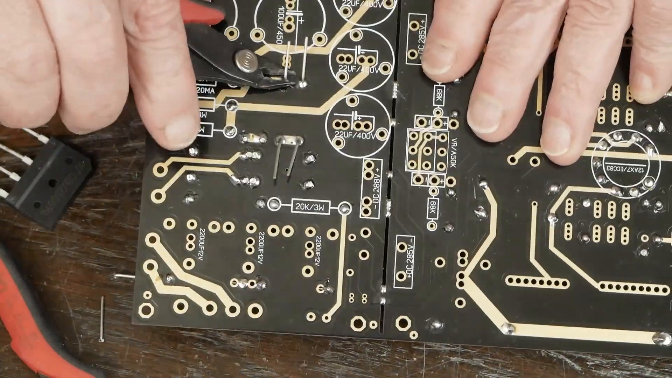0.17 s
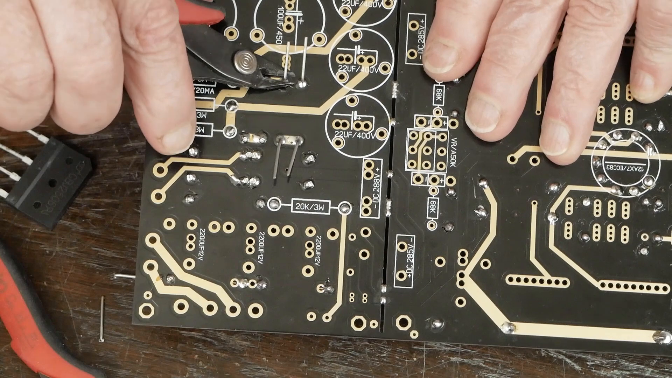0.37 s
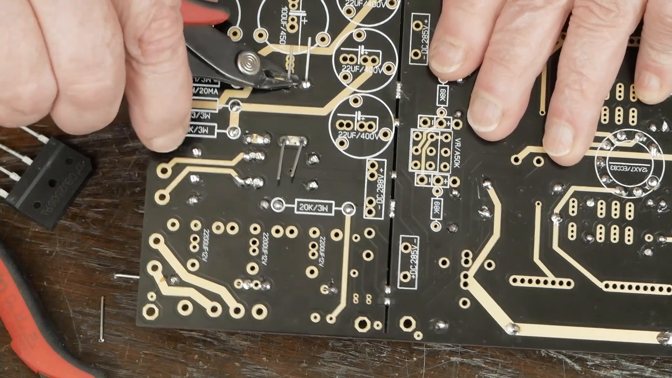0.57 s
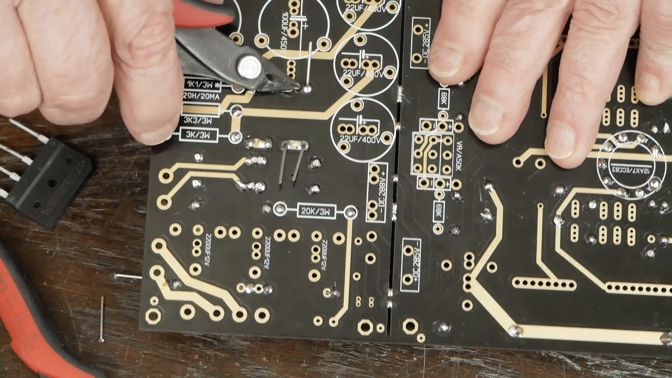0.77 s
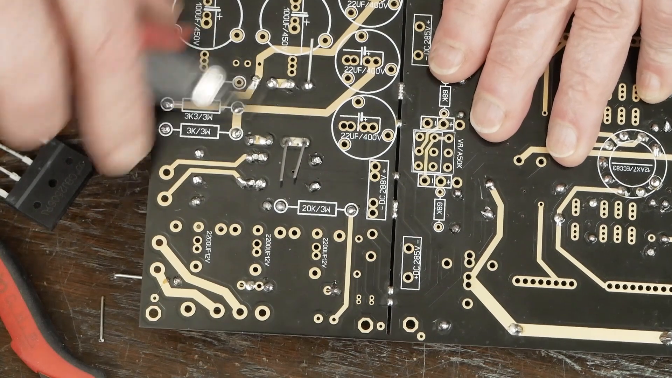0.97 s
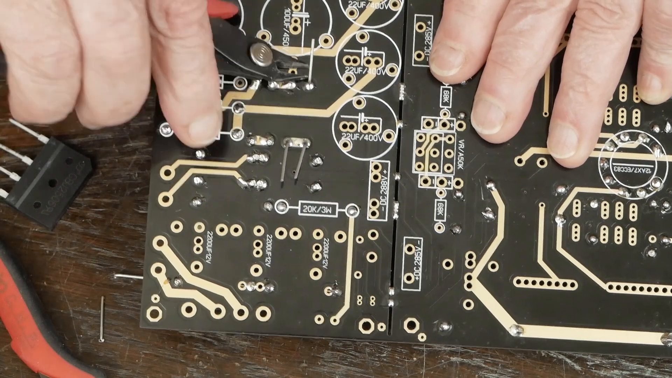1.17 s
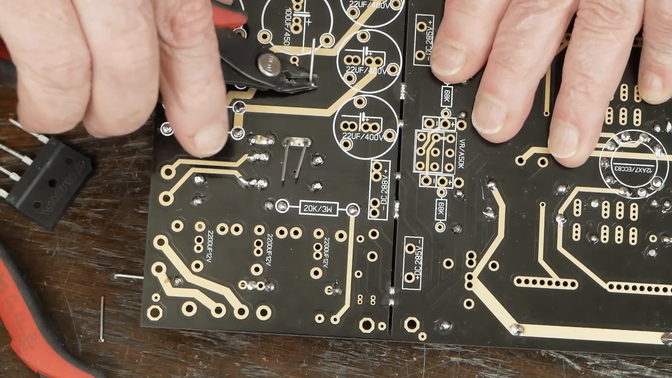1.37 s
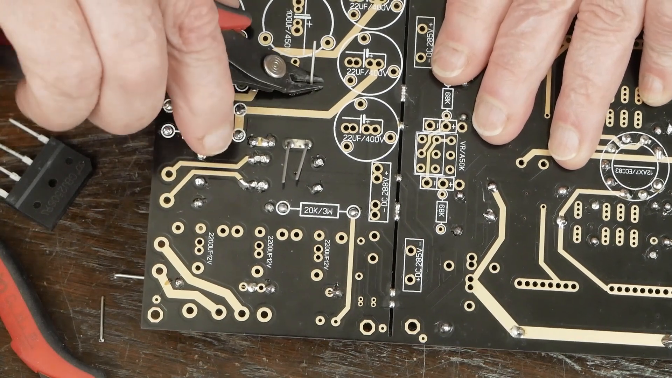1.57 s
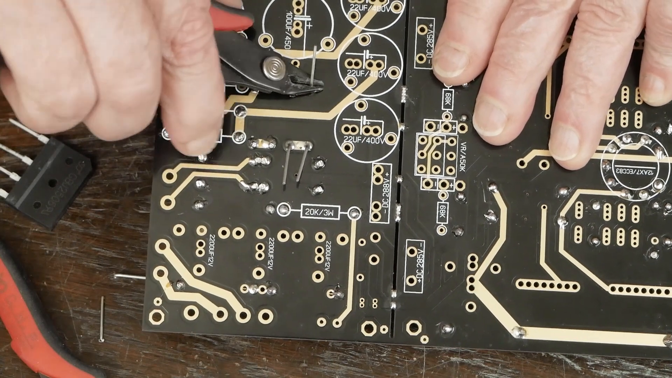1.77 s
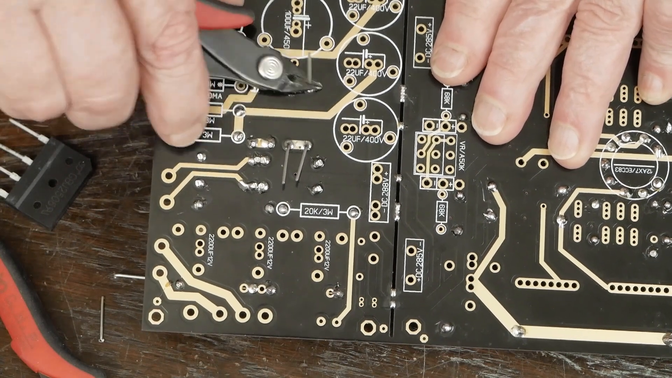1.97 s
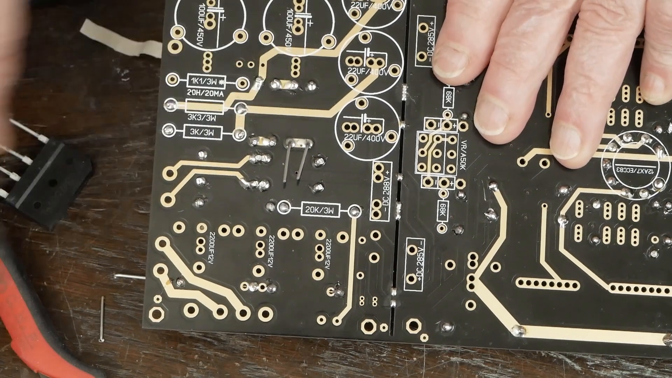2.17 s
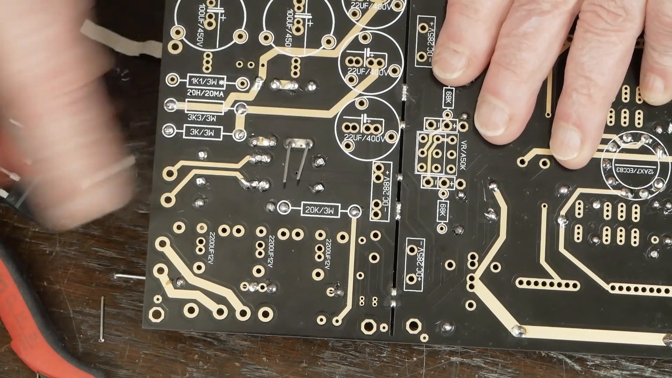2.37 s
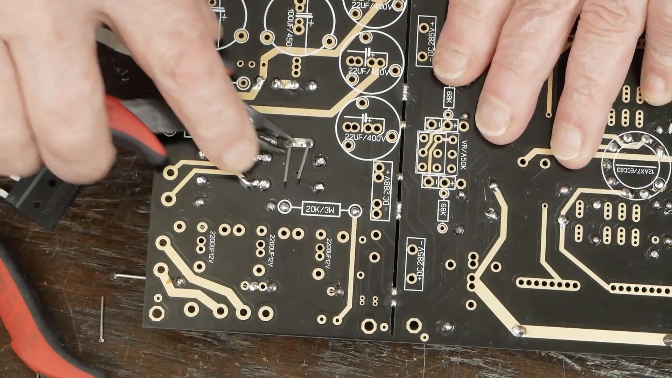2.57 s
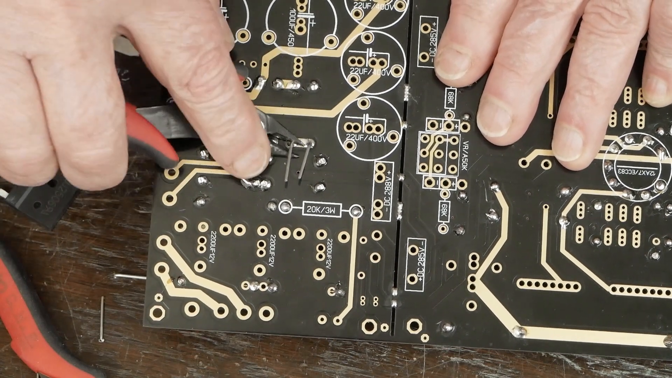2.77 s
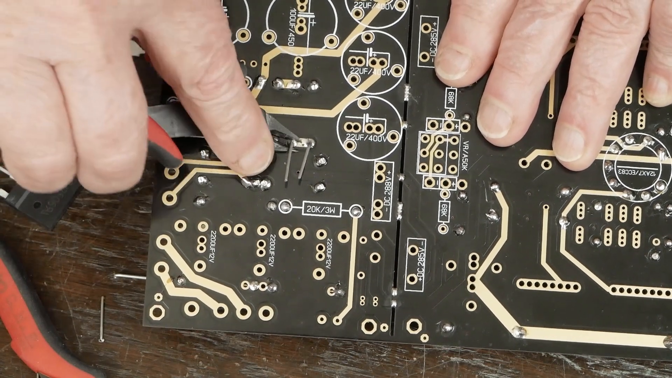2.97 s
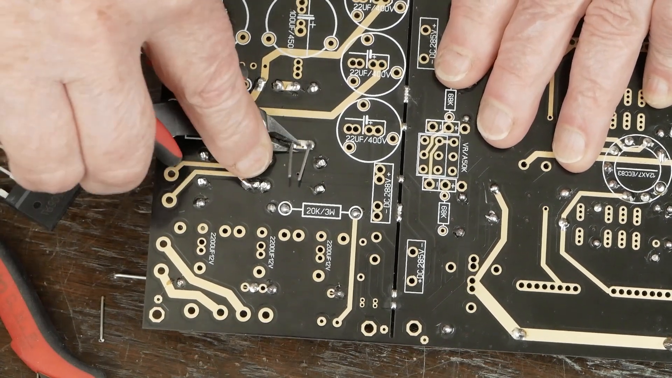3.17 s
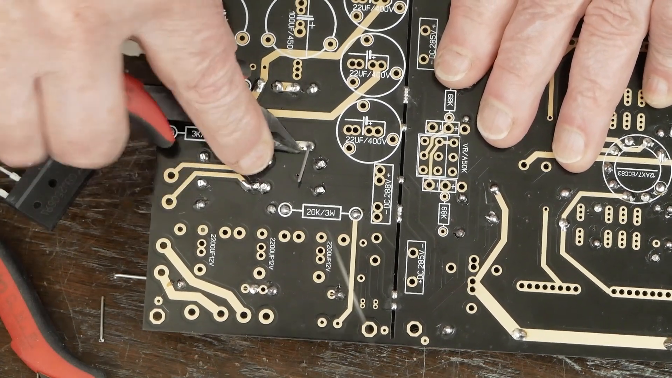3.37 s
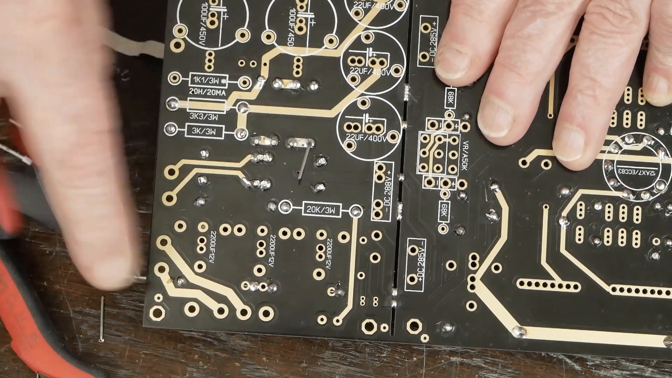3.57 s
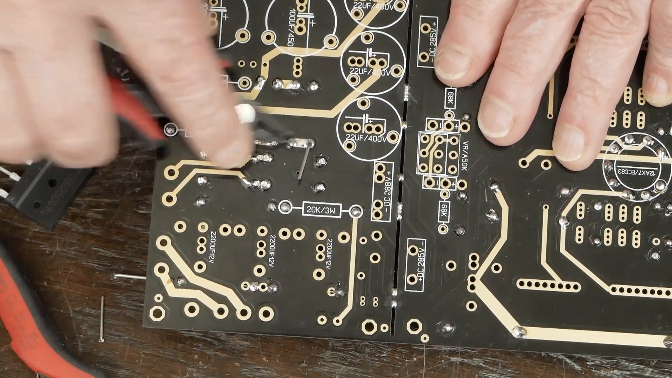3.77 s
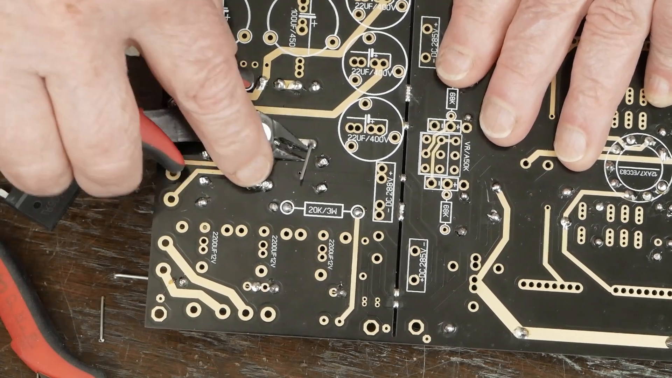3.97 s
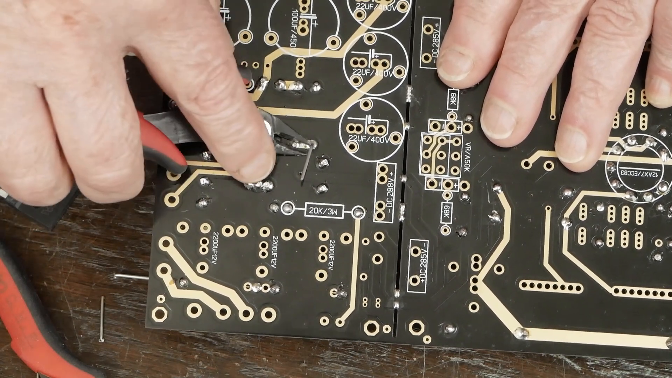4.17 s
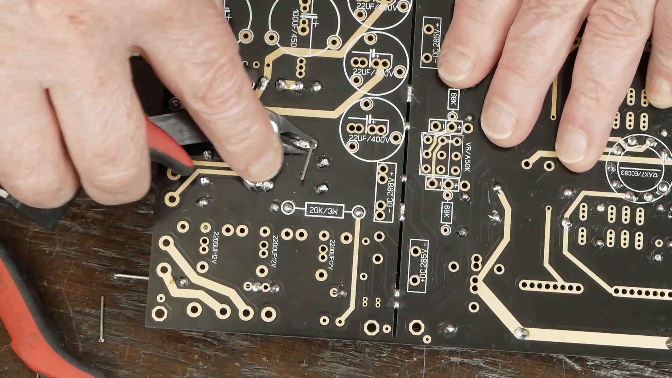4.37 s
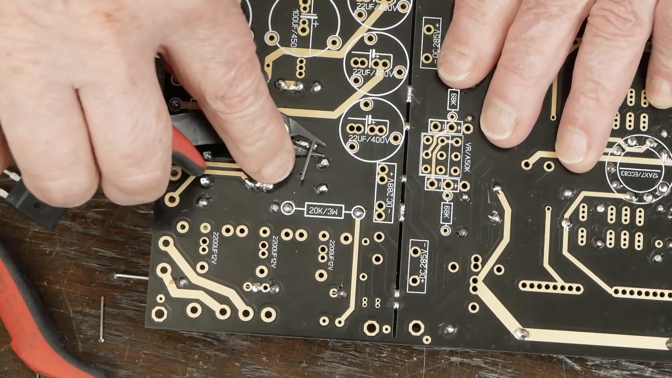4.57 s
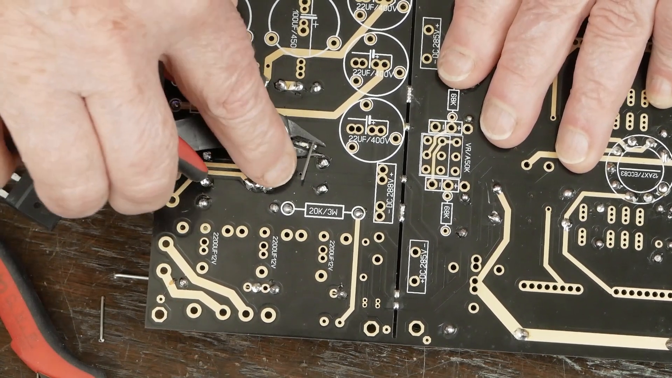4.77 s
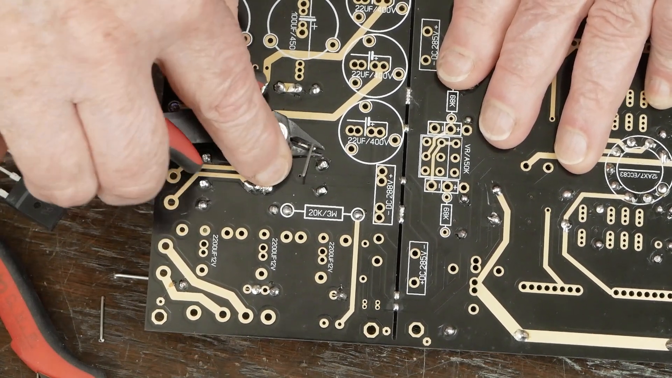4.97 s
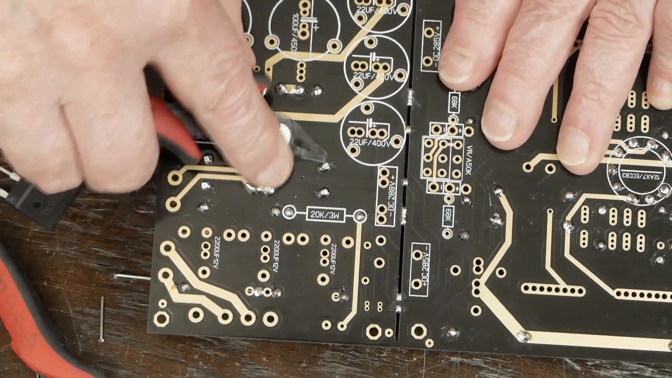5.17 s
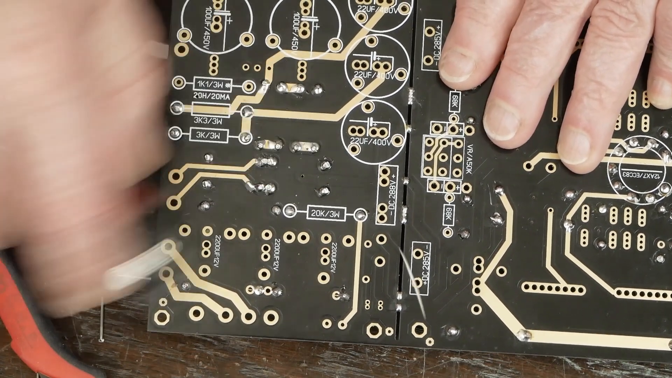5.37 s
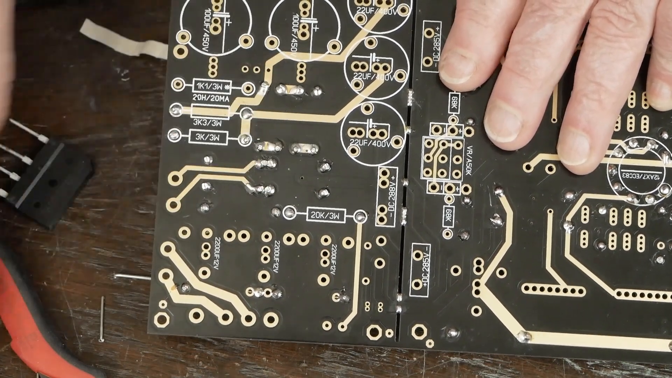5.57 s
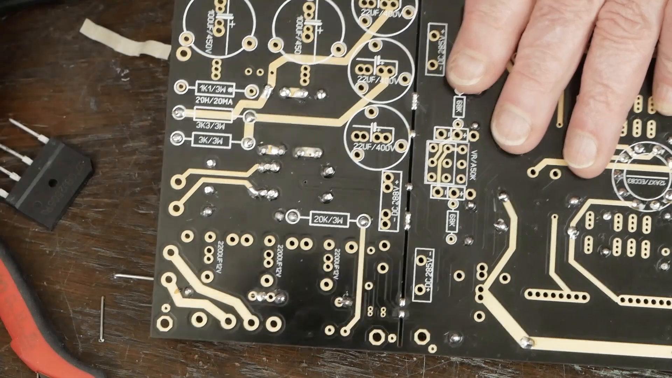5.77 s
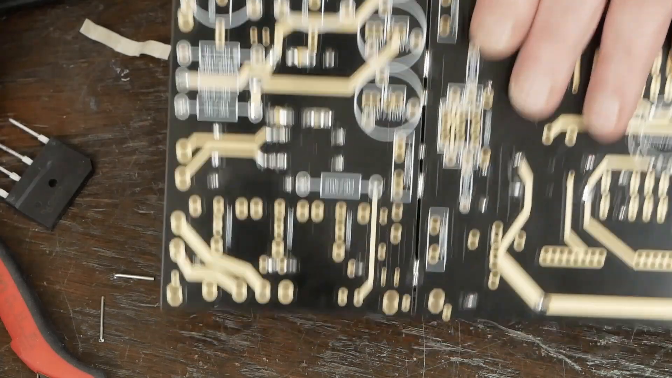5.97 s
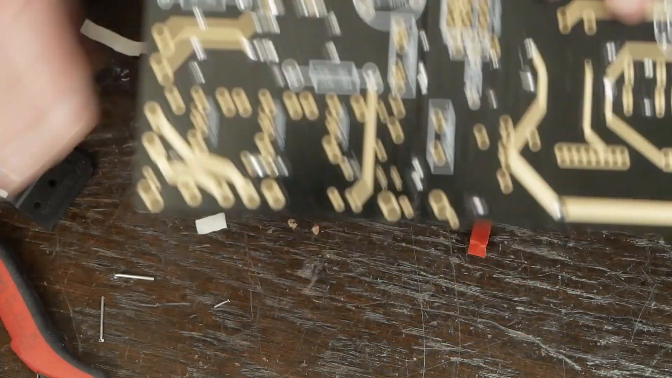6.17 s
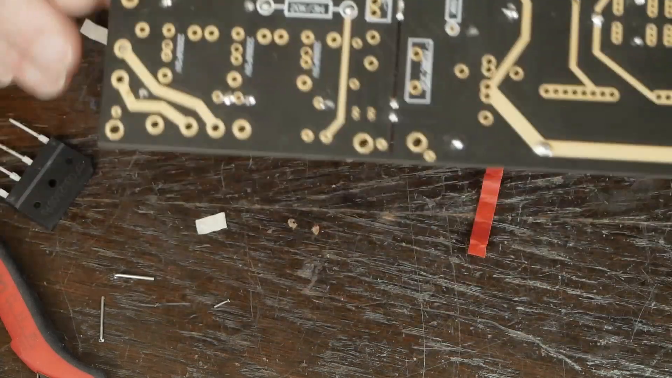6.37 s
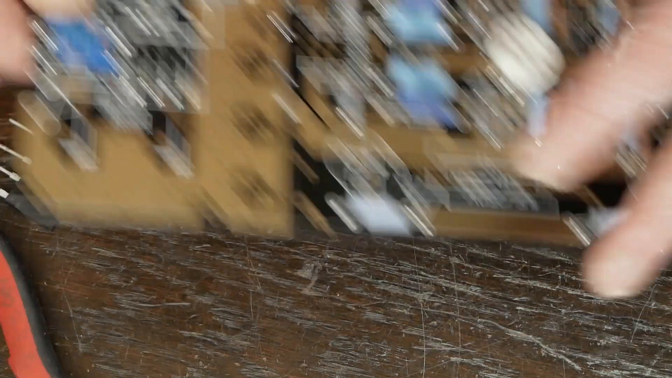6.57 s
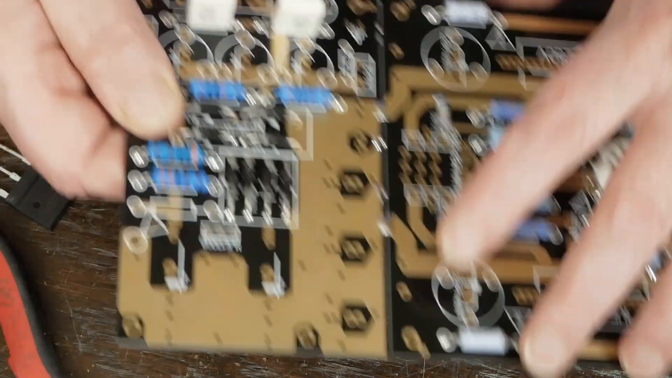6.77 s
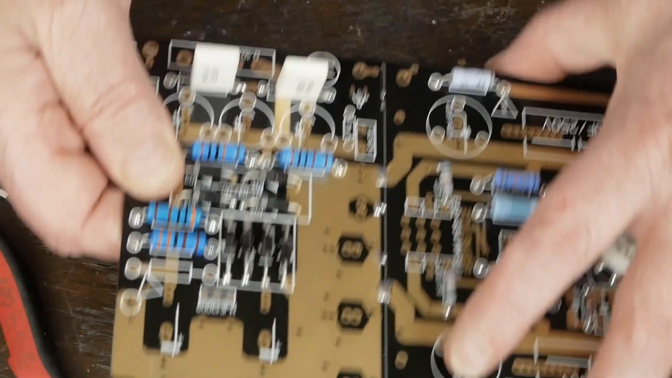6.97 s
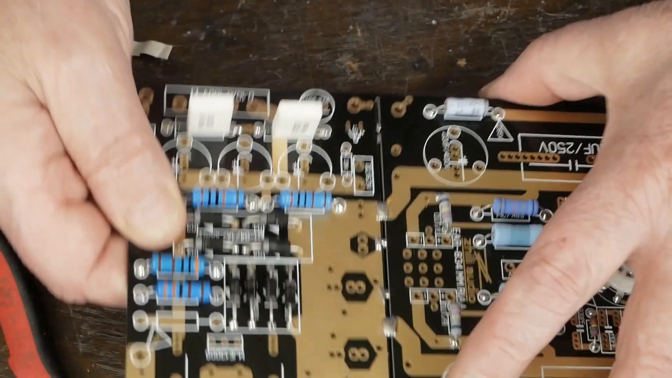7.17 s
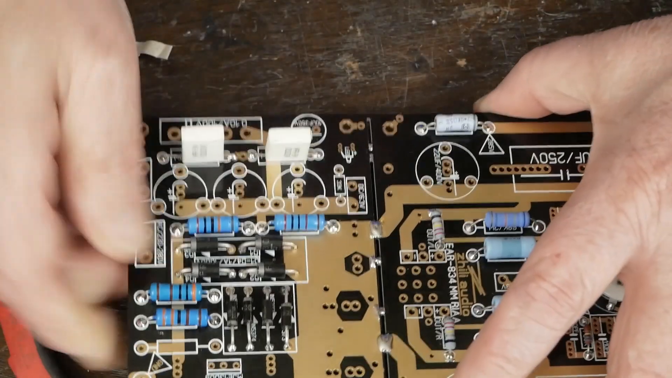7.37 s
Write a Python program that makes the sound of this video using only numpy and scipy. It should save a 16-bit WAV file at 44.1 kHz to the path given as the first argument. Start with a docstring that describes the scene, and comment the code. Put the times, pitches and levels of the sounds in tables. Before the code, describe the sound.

Small steel cutters work on a circuit board at a wooden bench, close and centred in a quiet room. A sharp snip comes at about 0.7 seconds, with the board knocking lightly just after. Bright steel clicks follow around 1.1 seconds, and a wire offcut bounces and tinkles until 1.6. A second snip at 1.9 sends another piece ticking across the board. Faint taps of the cutter tips lead to a strong snip at 3.3, then more light taps. The last snip comes at 5.1, and its offcut bounces, rolls and settles by 5.6. The board knocks on the bench around 5.9 and lifts with a soft brush. From 6.6 to about 7.4 seconds it slides through the fingers with a quiet rub and hiss, a few small clicks and a faint, very high squeak.

```python
"""A wooden bench in a quiet room: small steel cutters snip wire leads on a circuit board.
Each snip, tap or knock is a short burst that rings steel, board and bench, with a brief room tail.
The offcuts bounce and tinkle, and one rolls. At the end the board knocks the bench, lifts with a
soft brush and slides through the fingers, which rub, hiss and squeak on the lacquer."""
import sys
import numpy as np
from scipy import signal
from scipy.fft import rfft, irfft, next_fast_len
from scipy.io import wavfile
from scipy.ndimage import uniform_filter1d, map_coordinates

SR = 44100
rng = np.random.default_rng(int(sys.argv[2]) if len(sys.argv) > 2 else 0)


def materialize(psi):
    """Save the field psi as 16-bit PCM at rate SR to the path in sys.argv[1].

    A 1-D psi becomes a single channel; in a 2-D psi each row is a channel.
    """
    bounded = np.clip(np.atleast_2d(psi).T, -1, 1)
    quanta = np.round(bounded * 32767).astype(np.int16)
    wavfile.write(sys.argv[1], SR, quanta)


N = 327663


def amp(db):
    return 10 ** (np.asarray(db) / 20)


def unit(x):
    return x / np.sqrt(np.mean(x ** 2) + 1e-20)


def along(points, hz):
    """Read an EQ curve on a log frequency axis."""
    freqs, values = np.transpose(points)
    return np.interp(np.log(hz + 1), np.log(freqs + 1), values)


def curves(rows):
    """One automation curve per column after the time; -200 outside the rows."""
    times, *columns = np.transpose(rows)
    return [np.interp(np.arange(N) / SR, times, c, left=-200, right=-200) for c in columns]


def swell(start, stop, rise, fall):
    """A fader in dB: 0 from start to stop, 20 down at rise seconds before and fall seconds after."""
    t = np.arange(N) / SR
    return -20 * (np.clip(start - t, 0, None) / rise + np.clip(t - stop, 0, None) / fall)


def wobble(rate):
    """A smooth random curve, rate knots a second."""
    return map_coordinates(rng.standard_normal(int(N * rate / SR) + 4), [np.arange(N) * rate / SR])


def filtered(x, response):
    """Apply a complex frequency response."""
    size = next_fast_len(N + SR // 2)
    return irfft(rfft(x, size) * response(np.fft.rfftfreq(size, 1 / SR)), size)[..., :N]


def ringing(x, modes):
    """A resonator bank that keeps the power of white noise."""
    def response(f):
        bank = sum((-1) ** k * amp(db) * 1j * f * width / (hz * hz - f * f + 1j * f * width)
                   for k, (hz, width, db) in enumerate(modes))
        return bank / np.sqrt(np.mean(np.abs(bank) ** 2))
    return filtered(x, response)


def noise(spectrum, top_hz):
    """Coloured noise of rms 1 that ends steeply at top_hz."""
    colour = lambda hz: amp(along(spectrum, hz)) / (1 + (hz / top_hz) ** 80)
    return unit(filtered(rng.standard_normal(N), colour))


def tones(times, levels, modes, gain_db, scatter_db, attack_s):
    """Damped sines at each blow, every mode at a new strength and slightly detuned."""
    t = np.arange(SR // 3) / SR
    hz, db, t60 = np.transpose(modes)[:, :, None]
    out = np.zeros(N + SR)
    for start, level in zip(times, levels):
        strength, detune = rng.standard_normal((2, len(modes), 1))
        decay = amp(db + scatter_db * strength - 60 * t / t60)
        ring = (decay * np.sin(2 * np.pi * hz * (1 + .004 * detune) * t)).sum(0)
        out[round(start * SR):][:len(t)] += amp(level + gain_db) * ring * (1 - np.exp(-t / attack_s))
    return out[:N]


# Room tone colour: freq_hz, density_db
ROOM_TONE = [(12, -46), (20, -2), (48, -5), (65, -19), (100, -15), (177, -21), (215, -17.5), (474, -23),
             (714, -23), (796, -25.5), (1410, -24), (2010, -23), (3880, -26.5), (13600, -31)]
def room_tone():
    """A low, nearly steady bed of air."""
    return noise(ROOM_TONE, top_hz=13850) * amp(-60.5 + 0.35 * wobble(3.03))


# Capsule self-noise colour: freq_hz, density_db
CAPSULE_HISS = [(12, -31), (20, -2), (151, -10.5), (298, -8.5), (324, -14), (414, -10), (1490, -13.5),
                (1810, -8.5), (13600, -5)]
def stereo_side(mid):
    """Faint reflections and self-noise set the two capsules apart."""
    smear = rng.standard_normal(512) * np.hanning(512)
    reflections = amp(-39.5) * signal.fftconvolve(mid, smear / np.linalg.norm(smear))[:N]
    return reflections + amp(-72) * noise(CAPSULE_HISS, top_hz=14100)


# Resonances of the brush: pitch_hz, width_hz, gain_db
BRUSH_MODES = [(1380, 300, 0.5), (1870, 300, -3), (2700, 240, -3.5)]
def lift_brush():
    """A soft swell of noise as the board is lifted."""
    level_db = -55.5 + swell(6.25, 6.25, rise=0.22, fall=0.11)
    return ringing(rng.standard_normal(N) * amp(level_db), BRUSH_MODES)


# Path of the squeak: time_s, pitch_hz
SQUEAK_PATH = [(6.808, 15000), (6.83, 14000), (6.865, 13650), (6.915, 13170), (6.952, 13400), (6.99, 12600),
               (7.03, 12730), (7.075, 11940), (7.12, 12200), (7.2, 14150), (7.225, 14400)]
def finger_squeak():
    """A fingertip squeaks on the lacquer: one thin, unsteady whistle."""
    hz = curves(SQUEAK_PATH)[0] * (1 + 0.003 * wobble(450))
    fall_s = .012
    fader_db = swell(SQUEAK_PATH[0][0], SQUEAK_PATH[-1][0] - fall_s, rise=.001, fall=fall_s)
    level_db = -60 + fader_db + 3.3 * wobble(40)
    return np.sqrt(2) * amp(level_db) * np.sin(2 * np.pi * np.cumsum(hz) / SR)


# Faders of the slide: time_s, rub_db, hiss_db
SLIDE_FADERS = [(6.605, -77, -82), (6.62, -50.5, -59), (6.8, -54.5, -63), (6.91, -54.5, -58.5),
                (7.0, -55, -60), (7.1, -59, -64), (7.15, -55.5, -54), (7.25, -58, -64), (7.32, -52, -58),
                (7.43, -52, -53)]
# Board modes under the grip, broad ones and two that sing: pitch_hz, width_hz, gain_db
RUB_MODES = [(756, 470, -8.5), (1410, 130, -3.5), (1840, 460, -4.5), (2550, 320, -7), (2770, 260, -3),
             (3630, 1100, -11)]
SINGING_MODES = [
    [(1814, 56, 0)],
    [(4820, 130, 0)],
]
# Skin hiss colour: freq_hz, density_db
SKIN_HISS = [(1760, -24), (3000, -12), (4290, -13), (4980, -12), (5640, -11.5), (8120, -5), (8770, -6),
             (9930, -9), (11800, -5), (14200, -1)]
def board_slide():
    """Friction noise sounds through the board's modes while the skin hisses in patches."""
    rub_db, hiss_db = curves(SLIDE_FADERS)
    rub = ringing(rng.standard_normal(N) * amp(rub_db - 2.5 + 1.1 * wobble(70)), RUB_MODES)
    low_db = rub_db - 2.5 + 2.1 * wobble(14)
    high_db = -64 + swell(SLIDE_FADERS[1][0], 6.82, rise=.01, fall=0.042)  # sings only at first
    song = sum(unit(ringing(rng.standard_normal(N), mode)) * amp(db)
               for db, mode in zip((low_db, high_db), SINGING_MODES))
    spectra = signal.stft(noise(SKIN_HISS, top_hz=14200), nperseg=256)[2]
    patches = uniform_filter1d(rng.standard_normal(spectra.shape), 5, axis=0)  # blur in frequency
    patches = uniform_filter1d(patches, 12, axis=1)  # and in time
    hiss = signal.istft(spectra * amp(2.5 * unit(patches)), nperseg=256)[1][:N]
    return rub + song + hiss * amp(hiss_db + 1.8 * wobble(50))


# One value per layer, bright to dark: snap or tick, jaw, board, bench
BURST_STRETCH = [1.05, 1.3, 2.1, 3.1]  # how much longer the contact drives it: t60_ratio
TAIL_DECAY = [.24, .26, .28, .3]  # room tail: t60_s
TAIL_TRIM = [-5, -3, 0, 0]  # the room swallows treble first: gain_db
def blows(times, levels, t60s, sends_db, gain_db, onset_s, spike, clump_db):
    """One exciter per layer: a noise burst and a room tail at each contact, with a spike in the first."""
    layers = levels.shape[1]
    stretch, tail_t60, trim_db = np.array([BURST_STRETCH, TAIL_DECAY, TAIL_TRIM])[:, :layers, None]
    t = np.arange(SR // 2) / SR
    first_echo_s = .008
    tail = amp(trim_db - 60 * t / tail_t60) * (1 - np.exp(-(t / first_echo_s) ** 3))
    clumps = amp(clump_db * wobble(250))  # reflections arrive in clumps
    drive = np.zeros((layers, N + SR))
    for start, db, t60, send_db in zip(times, levels, t60s, sends_db):
        burst = (1 - np.exp(-t / onset_s)) * amp(-60 * t / (t60 * stretch))
        hit = np.hypot(burst, amp(send_db) * tail) * rng.standard_normal((layers, len(t)))
        hit[0, round(onset_s * SR)] += spike
        drive[:, round(start * SR):][:, :len(t)] += amp(db + gain_db)[:, None] * hit
    return drive[:, :N] * clumps


# Offcut landings, before make-up gain: start_s, tick_db, board_db
OFFCUT_BOUNCES = [(1.285, -39.5, -52.5), (1.381, -45, -47), (1.389, -28, -46), (1.45, -50, -58),
                  (1.4673, -36.5, -52), (1.497, -42, -54), (1.5281, -42.5, -54.5), (1.5532, -42, -58),
                  (1.6017, -55, -65), (2.17, -26, -51.5), (2.184, -32, -46.5), (2.24, -38, -50),
                  (2.246, -35, -56), (5.2235, -28, -47), (5.2605, -29.5, -46.5), (5.2879, -41, -52),
                  (5.302, -37, -64), (5.378, -44.5, -60), (5.392, -44, -63), (5.434, -46, -62),
                  (5.489, -32, -45.5), (5.505, -37, -50.5), (5.5304, -44, -55), (5.574, -35.5, -52),
                  (5.6088, -39.5, -58)]
# Resonances of wire tick, steel jaws and board: pitch_hz, width_hz, gain_db
TICK_MODES = [(9100, 1500, -6), (11300, 1300, -2), (12700, 1600, -0.5), (14340, 1300, 0)]
JAW_MODES = [(4070, 1000, 0.67), (5780, 1370, 1), (7320, 1220, 0.02)]
BOARD_MODES = [(1240, 245, -3), (1620, 300, -3.5), (1817, 140, 2.5), (2283, 240, 2), (2646, 105, 4),
               (2944, 117, 1), (3203, 150, -1), (3590, 490, -4.5)]
# Thin ring of an offcut: pitch_hz, gain_db, t60_s
WIRE_TONES = [(12800, 0.5, .11), (12950, -5, .07), (12050, -9, .03), (14550, -7, .05), (9380, -11, .04),
              (5030, -15, .04), (3490, -9, .06)]
def offcuts():
    """Bits of wire tick on the board and ring at their own modes; one rolls, then settles."""
    times, tick_db, board_db = np.transpose(OFFCUT_BOUNCES)
    levels = np.transpose([tick_db, (tick_db + board_db) / 2 + 1, board_db])
    drive = blows(times, levels, t60s=[.014] * len(times), sends_db=[-14.5] * len(times),
                  gain_db=2.5, onset_s=0.00024, spike=5, clump_db=0)
    ticks = sum(map(ringing, drive, (TICK_MODES, JAW_MODES, BOARD_MODES)))
    roll_db = -56 + swell(5.27, 5.46, rise=.005, fall=0.094)
    roll = ringing(rng.standard_normal(N) * amp(roll_db + 5 * wobble(180)), TICK_MODES)
    tinkle = tones(times, tick_db - 24, WIRE_TONES, gain_db=11, scatter_db=2, attack_s=.0005)
    return ticks + roll + tinkle


# A lead parts, then the jaws slam shut; levels before make-up gain:
# start_s, snap_db, board_db, ring_db, send_db, slam_delay_s, slam_snap_db, slam_board_db
LEAD_SNIPS = [(0.688, -16.5, -32, -39, -5.5, 0.0052, -15, -28.5),
              (1.87, -20.5, -32.5, -35, -17.5, 0.0042, -48, -36.5),
              (3.3397, -18, -36, -53, -3.5, .0084, -17, -22.5),
              (5.1411, -18.5, -27.5, -37, -14, 0.011, -44, -29.5)]
# Handling hits, before make-up gain: start_s, snap_db, board_db, bench_db
STEEL_CLICKS = [(0.3112, -57, -73, -80), (1.072, -33, -37.5, -52), (1.1428, -44.5, -48, -58.5),
                (1.1628, -21, -45, -78), (1.166, -19.5, -41, -80), (6.8746, -31, -42.5, -65),
                (6.982, -37, -44.5, -60), (7.0259, -47.5, -62, -70), (7.1217, -52, -64, -65),
                (7.345, -54, -61, -78), (7.414, -45, -56, -80)]  # bright clicks of steel and parts
TIP_TAPS = [(0.072, -70, -48.5, -56), (2.5481, -51, -47.5, -53.5), (2.6824, -46.5, -49.5, -59),
            (2.815, -53, -49.5, -58), (3.1123, -68, -55, -77), (3.5297, -52, -59, -52.5),
            (3.8403, -80, -55, -57), (3.912, -57, -59, -64.5), (4.114, -58, -55, -63),
            (4.2064, -80, -55.5, -56.5), (4.3745, -59, -63, -66), (4.4492, -65, -59, -76),
            (4.5347, -43.5, -41.5, -51.5), (4.846, -62, -51.5, -66)]  # the cutter tips touch the board
BENCH_KNOCKS = [(0.7066, -36, -28, -34.5), (0.8142, -31.5, -32.5, -36), (5.736, -82, -56, -42),
                (5.8338, -48, -44.5, -37), (5.8773, -54, -53, -51), (5.9173, -32.5, -21.5, -23),
                (5.924, -33, -21.5, -42)]  # the board knocks on the bench
def contacts():
    """Cue list: start_s, snap_db, jaw_db, board_db, bench_db, hollow_db, ring_db, t60_s, send_db."""
    def jaw(snap, board):
        return (snap + board) / 2 - 4

    def cut(start, snap, board, ring_db, t60_s, send_db):
        bench, hollow = board - 13.5, board - 26
        return start, snap, jaw(snap, board), board, bench, hollow, ring_db, t60_s, send_db

    def handling(table, t60_s, send_db, hollow_db, ring_db):
        return [(start, snap, jaw(snap, board), board, bench, bench + hollow_db,
                 jaw(snap, board) + ring_db, t60_s, send_db) for start, snap, board, bench in table]

    cues = []
    for start, snap, board, ring, send, delay, slam_snap, slam_board in LEAD_SNIPS:
        cues.append(cut(start, snap, board, ring, t60_s=0.025, send_db=send))
        cues.append(cut(start + delay, slam_snap, slam_board, ring_db=-200, t60_s=0.0091, send_db=-11.5))
    cues += handling(STEEL_CLICKS, t60_s=0.028, send_db=-15.5, hollow_db=-3, ring_db=-9)
    cues += handling(TIP_TAPS, t60_s=0.0071, send_db=-13.5, hollow_db=-3.5, ring_db=-7)
    cues += handling(BENCH_KNOCKS, t60_s=0.02, send_db=-14.5, hollow_db=-17, ring_db=-7)
    return np.array(cues)


# Bright snap of steel and wooden body of the bench: pitch_hz, width_hz, gain_db
SNAP_MODES = [(9610, 1240, -1), (10190, 1300, 4), (11400, 5800, -2), (14800, 400, -2.5)]
BENCH_MODES = [(120, 40, -11.5), (210, 26, -9), (342, 73, -9.5), (520, 45, -3), (610, 22.4, 3),
               (718, 45, 2.5), (798, 54, -0.5), (987, 150, -2)]
# Clear tones set off by a blow: pitch_hz, gain_db, t60_s
HOLLOW_TONE = [(296.6, -0.2, 0.17)]
STEEL_TONES = [(2040, 1.5, .2), (2075, -5, .15), (3480, -14, .07), (5300, -17, .07), (6760, -16, .09),
               (7540, -16, .07), (9060, -13, .08), (10080, -13, .05)]
def cutters():
    """Each snip or knock shakes steel, board and bench, leaving a hollow tone and a fluttering ring."""
    times, *layer_dbs, hollow_db, ring_db, t60s, sends_db = contacts().T
    drive = blows(times, np.transpose(layer_dbs), t60s, sends_db,
                  gain_db=6.5, onset_s=0.00056, spike=3.5, clump_db=1)
    hits = sum(map(ringing, drive, (SNAP_MODES, JAW_MODES, BOARD_MODES, BENCH_MODES)))
    hollow = tones(times, hollow_db, HOLLOW_TONE, gain_db=7.5, scatter_db=1, attack_s=0.0027)
    ring = tones(times, ring_db, STEEL_TONES, gain_db=3, scatter_db=2, attack_s=0.00092)
    return hits + hollow + ring * (.6 + .8 * wobble(130))


def scene():
    """All sources sit straight ahead, with a trace of stereo width."""
    mid = cutters() + offcuts() + board_slide() + lift_brush() + finger_squeak() + room_tone()
    side = stereo_side(mid)
    return np.array([mid + side, mid - side]) * amp([[-.15], [.15]])


# Microphone response: freq_hz, gain_db
MIC_EQ = [(100, 0), (14800, 0.46), (15500, -16), (16000, -31), (16600, -49)]
def record(dry):
    """The microphone fades in the top octave and nothing passes above the band limit."""
    limit_hz = 16828
    return filtered(dry, lambda hz: amp(along(MIC_EQ, hz)) * (hz < limit_hz))


dry = scene()
out = record(dry)
materialize(out)
```